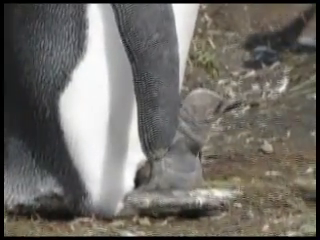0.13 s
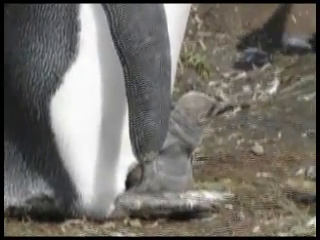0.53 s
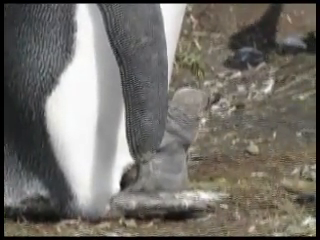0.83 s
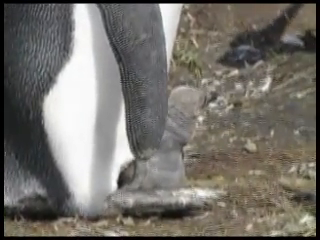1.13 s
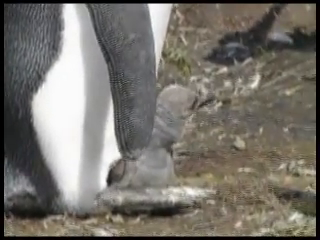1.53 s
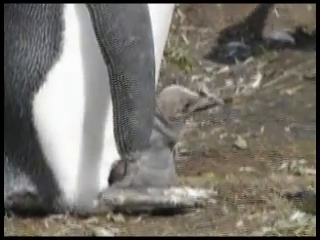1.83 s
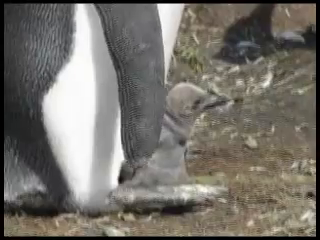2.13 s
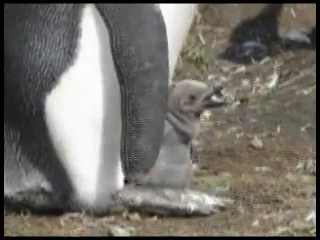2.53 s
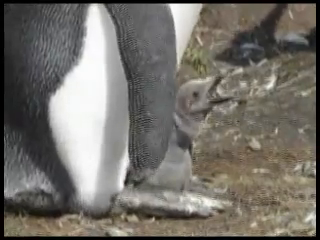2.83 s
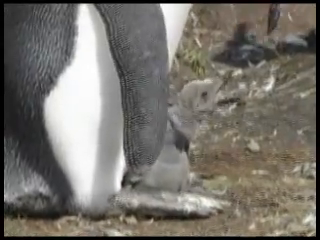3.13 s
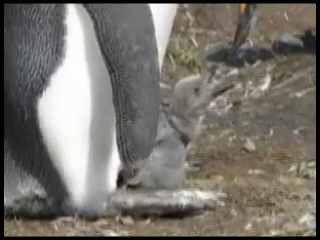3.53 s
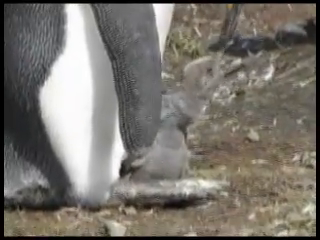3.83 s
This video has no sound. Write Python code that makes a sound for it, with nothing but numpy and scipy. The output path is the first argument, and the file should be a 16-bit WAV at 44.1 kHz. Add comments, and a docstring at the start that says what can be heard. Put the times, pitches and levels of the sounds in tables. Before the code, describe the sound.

A penguin's loud two-toned braying breaks into shorter honks and stops; a chick chirps four times

```python
"""An adult penguin close by brays in honking bursts; the two halves of its voice box buzz at slightly different
pitches and beat. Short runs of slow clicks and a hiss of air fall between honks. Its chick answers with four
thin, partly raspy whistles: gliding sines with a fluttering, hissing rasp. A colony murmurs far off (filtered
noise) with a few soft coos, small ticks sound, and light wind buffets the microphone as low, lumpy noise."""
import sys
import numpy as np
from scipy import signal
from scipy.fft import rfft, irfft
from scipy.io import wavfile
from scipy.ndimage import uniform_filter1d

SR = 44100
rng = np.random.default_rng(int(sys.argv[2]) if len(sys.argv) > 2 else 0)


def output_pcm(signal):
    """Save a mono or channel-first signal as 16-bit PCM at the path in sys.argv[1].

    Samples are clipped to [-1, 1] before scaling.
    """
    pcm = np.clip(np.atleast_2d(signal).T, -1, 1) * 32767
    wavfile.write(sys.argv[1], SR, np.round(pcm).astype(np.int16))


N = 176400
T = np.arange(N) / SR  # time in s

# how throat and beak pass each pitch, for honks and clicks alike: f/Hz, relative level/dB
THROAT = [(180, -70.5), (300, -28), (416, -25), (545, -14.5), (747, -6), (880, -11.5), (1030, -3.5),
          (1150, -12.5), (1280, -6), (1460, -18.5), (1700, -7.5), (2050, -6.5), (2330, -21), (2680, -6.5),
          (3270, -21), (3670, -16), (4920, -21.5), (6400, -28.5), (8000, -39.5), (10000, -52.5),
          (11500, -75)]


def undb(db):
    """Turn decibels into a gain."""
    return 10 ** (np.asarray(db) / 20)


def unit(x):
    """Scale to an rms level of 1."""
    return x / np.sqrt(np.mean(x ** 2))


def colour(x, points, size=4096):
    """Filter through (f/Hz, level/dB) points, with no sound ahead of its cause (minimum phase)."""
    hz, db = np.array(points, float).T
    bin_hz = np.arange(size // 2 + 1) * SR / size
    log_gain = np.interp(np.log(bin_hz + 1), np.log(hz), db) * np.log(10) / 20
    # fold the cepstrum forward in time
    cepstrum = irfft(log_gain)
    cepstrum[1:size // 2] *= 2
    cepstrum[size // 2 + 1:] = 0
    response = irfft(np.exp(rfft(cepstrum)))
    return signal.fftconvolve(x, response)[:len(x)]


def noise(points):
    """Coloured noise with an rms level of 1."""
    return unit(colour(rng.standard_normal(N), points))


def walk(rate):
    """Smooth random wandering: levels drawn rate times a second, slewed twice; rms 1."""
    hold = int(SR / rate)
    steps = np.repeat(rng.standard_normal(N // hold + 1), hold)
    slewed = uniform_filter1d(uniform_filter1d(steps, hold), hold)
    return unit(slewed[:N])


def curve(table, silent=None):
    """Draw each column of a table as straight lines in time; silent is the value after the last row."""
    rows = np.array(table, float).T
    return [np.interp(T, rows[0], column, right=silent) for column in rows[1:]]


def buzz(phase, roll, rough):
    """A train of sharp pulses, each overtone weaker by exp(-roll); uneven and breathy when rough."""
    shimmer_db, breath_db = 6, -7  # both at a roughness of 1
    r, c = np.exp(-roll), np.cos(phase)
    # closed form of the sum of all overtones, scaled to an even level
    pulses = (r * c - r ** 2) / (1 - 2 * r * c + r ** 2)
    pulses = pulses * np.sqrt(2 * (1 - r ** 2)) / r
    breath = unit((1 + c) ** 2 * rng.standard_normal(N))  # puffs once a cycle
    return pulses * undb(shimmer_db * rough * walk(200)) + rough * undb(breath_db) * breath


def adult():
    """Two buzzing voices share one throat; they slip quickly past unison and linger apart."""
    # centre pitches of the two voices: t/s, lower voice f/Hz, upper voice f/Hz
    voices = [(0, 362.8, 389), (.07, 330.6, 369.4), (.1, 367.4, 396.6), (.13, 441.7, 451.4),
              (.165, 471.8, 479.5), (.2, 460.4, 463.4), (.25, 382.3, 428.6), (.36, 331, 363.7),
              (.41, 399, 432.5), (.46, 457.2, 454.6), (.5, 435.7, 460.5), (.56, 406, 437.1),
              (.62, 424.5, 448), (.67, 461.4, 488.2), (.7, 493.3, 519.5), (.74, 463.1, 486),
              (.78, 385, 417.5), (.82, 353.9, 382.9), (.86, 405.1, 434.9), (.9, 464.4, 496.9),
              (.925, 505, 532), (.96, 518.9, 518), (.99, 515, 535), (1.02, 485.8, 510.5),
              (1.06, 440, 469.5), (1.1, 390.3, 415), (1.16, 344.4, 373.4), (1.285, 360, 384.1),
              (1.33, 385.4, 414), (1.41, 342.6, 369.4), (1.6, 189.9, 193.9), (1.625, 347, 372.3),
              (1.68, 330.6, 357.4), (1.735, 185, 186), (1.76, 215.7, 217.5), (1.8, 257.4, 261.6),
              (1.82, 359.5, 402.5), (1.84, 370, 412.1), (1.91, 335, 367.3), (2.0, 120.6, 125.7),
              (2.045, 243.8, 300), (2.065, 352.8, 382.1), (2.11, 403.8, 432.5), (2.19, 348, 380.6),
              (2.44, 181.2, 184.4)]
    # loudness of the bray: t/s, level/dB
    bray = [(0.0, -31.5), (0.07, -37), (0.15, -22.5), (0.38, -40), (0.43, -23), (0.58, -28.5), (0.73, -21),
            (0.74, -25), (0.81, -32.5), (0.95, -17.5), (1.03, -20.5), (1.165, -39), (1.18, -57),
            (1.255, -56), (1.3, -29), (1.34, -26.5), (1.41, -44), (1.44, -58), (1.56, -61.5), (1.61, -32.5),
            (1.67, -41), (1.69, -54.5), (1.73, -53), (1.745, -38.5), (1.85, -29.5), (1.94, -64),
            (2.0, -50.5), (2.06, -33.5), (2.12, -25.5), (2.18, -38.5), (2.2, -56), (2.41, -94), (2.42, -55),
            (2.46, -57), (2.52, -77)]
    low, high = curve(voices)
    db = curve(bray, -120)[0]

    # below -22 dB the voice weakens: it gets rougher and its pulses lose treble
    weak_db = np.clip(-22 - db, 0, 40)
    rough = np.minimum(.018 * (3.0 + weak_db), .28)
    pulse_top_hz = 6880  # overtones of a full voice fall by 1 / e over this span
    duller_per_db, duller_ref_hz = 0.5766, 406  # slower buzzing keeps more treble
    top_hz = pulse_top_hz * undb(-duller_per_db * weak_db * low / duller_ref_hz)

    jitter = 0.0414  # share of the pitch, at a roughness of 1
    a, b = (2 * np.pi * np.cumsum(hz * (1 + jitter * rough * walk(250))) / SR for hz in (low, high))
    beat = b - a
    # in radians: the voices push each other out of step, and both hurry and drag once a beat
    pull, sway_size, sway_lag = 0.51, .35, 1.5
    push = pull / 2 * np.sin(beat)
    sway = sway_size * np.sin(beat - sway_lag)
    lower = buzz(a + sway - push, low / top_hz, rough)
    upper = undb(-0.5) * buzz(b + sway + push, high / top_hz, rough)
    voice = colour(lower + upper, THROAT)

    # even out the level, then set it by the table
    power = uniform_filter1d(uniform_filter1d(voice ** 2, size=3000), size=3000)
    steady = voice / np.sqrt(power)
    beat_db, beat_lag = 1, 2.63  # one shared air stream: swell once a beat; lag in radians
    return steady * undb(db + beat_db * np.cos(beat - beat_lag))


def wind():
    """Wind on the microphone: low lumpy rumble, a brighter buffet whose share varies, a few sudden thumps."""
    # strength of the wind: t/s, rumble level/dB before lumps, buffet level/dB relative to the rumble
    strength = [(0.0, -27.5, -14.5), (.16, -45.5, -7.5), (0.36, -62, 4), (0.59, -39.5, -16),
                (0.78, -34, -11.5), (0.9, -51, -19), (1.09, -36.5, -14), (1.29, -59.5, -2), (1.48, -43, -7),
                (1.84, -47.5, -4), (2.32, -40, -17), (2.53, -45, -9), (2.63, -29.5, -10),
                (2.76, -34.5, -10.5), (2.95, -35, -3.5), (3.0, -43.5, -15), (3.61, -52, -19),
                (4.0, -49, -11)]
    # sudden thumps of wind: t/s, starting level/dB before softening
    bumps = [(0.56, -27.5), (1.96, -31), (2.609, -29.5), (2.678, -48), (2.914, -16.5)]
    # tone of the rumble: f/Hz, relative level/dB
    rumble_tone = [(12, -11.5), (25, 5.5), (50, 0), (85, -7.5), (130, -30), (300, -62.5)]
    # tone of the buffet: f/Hz, relative level/dB
    buffet_tone = [(40, -35.5), (90, 9.5), (150, 1), (250, -7.5), (500, -23.5), (1000, -30.5),
                   (4000, -90.5)]
    thump_t60_s = 0.04  # time to fall by 60 dB

    db, bright_db = curve(strength)
    lumps = unit(walk(29.86) + walk(9.9))
    thumps = sum((T > s) * undb(peak_db - 60 * np.abs(T - s) / thump_t60_s) for s, peak_db in bumps)
    thumps = uniform_filter1d(thumps, size=200)  # soften the onsets
    rumble = noise(rumble_tone) * undb(db + 4.6 * lumps)
    buffet = noise(buffet_tone) * (undb(db + bright_db + 4 * lumps) + thumps)
    return rumble + buffet


def colony():
    """Distant birds blur into third-octave bands of noise, swelling together, each flickering a little."""
    # tone of the murmur: f/Hz, relative level/dB
    murmur_tone = [(120, -45), (200, -14), (280, -18), (340, -19.5), (504, -16), (600, -22), (744, -14.5),
                   (1340, -21.5), (1850, -20.5), (2840, -26), (4920, -30.5), (9000, -38.5), (11000, -51.5),
                   (13000, -67.5)]
    # loudness of the murmur before swells: t/s, level/dB
    murmur_level = [(0, -45), (1.5, -63), (2.4, -64.5), (3.3, -61), (3.7, -58.5)]
    flicker_db, swell_db = 1.5, 3.1  # typical sizes; the flicker shrinks above 2500 Hz

    bed, out = noise(murmur_tone), 0
    edges = 150 * 2 ** (np.arange(21) / 3)  # Hz
    for lo, hi in zip(edges, edges[1:]):
        band = signal.sosfilt(signal.butter(2, [lo, hi], "band", fs=SR, output="sos"), bed)
        out = out + band * undb(flicker_db * walk(24.87) * min(1, 2500 / hi))
    return unit(out) * undb(curve(murmur_level)[0] + swell_db * walk(25))


def small_sounds():
    """Coos are sines that rise and fade while their pitch sags; ticks are quickly fading noise."""
    # short soft coos farther off: t/s, length/s, starting f/Hz, peak level/dB
    coo_rows = [(0.158, 0.11, 224, -46.5), (1.167, 0.053, 227, -48.5), (2.279, 0.046, 476, -53.5),
                (3.036, 0.063, 564, -50.5), (3.095, 0.016, 463, -47.5), (3.457, 0.055, 523, -49.5),
                (3.863, 0.013, 520, -47.5)]
    # small dull ticks: t/s, starting level/dB
    tick_rows = [(3.228, -43.5), (3.541, -57.5), (3.625, -51.5)]
    # tone of a tick: f/Hz, relative level/dB
    tick_tone = [(300, -28.5), (900, 6.5), (2500, -2.5), (5000, -3), (13000, -34.5)]
    coo_sag = 0.25  # share of its pitch that a coo loses by its end
    tick_t60_s = 0.03  # time to fall by 60 dB

    coos, ticks = np.zeros(N), np.zeros(N)
    for s, length, hz, db in coo_rows:
        u = np.clip((T - s) / length, 0, 1)  # 0 to 1 through the coo
        phase = 2 * np.pi * hz * length * (u - coo_sag * u ** 3 / 3)
        coos += undb(db) * np.sin(np.pi * u) * np.sin(phase)
    for s, db in tick_rows:
        ticks += (T > s) * undb(db - 60 * np.abs(T - s) / tick_t60_s)
    return coos + ticks * noise(tick_tone)


def creaks():
    """Slow voice-box clicks, sharp pulses with a noisy ring through the throat; plus air hissing in the beak."""
    # runs of clicks: t/s, clicks, clicks per s, first and last peak level/dB before the ring
    runs = [(1.178, 4, 100, -37, -35), (1.231, 2, 92.5, -43, -40), (1.2527, 4, 97, -31, -27),
            (1.442, 1, 100, -36, -36), (1.5625, 5, 107, -38.5, -28.5), (1.707, 2, 78, -48, -39),
            (2.001, 3, 61, -42.5, -41.5), (2.422, 2, 105, -43.5, -46)]
    # air hissing between two honks: t/s, level/dB
    hiss_level = [(1.12, -75), (1.2, -59.5), (1.33, -50), (1.45, -70.5), (1.55, -95.5)]
    # tone of the hiss: f/Hz, relative level/dB
    hiss_tone = [(2500, -21), (6000, 3.5), (9000, -6.5), (12500, -29)]
    ring_t60_s, ring_db = 0.026, -16  # time to fall by 60 dB; level against the pulse before filtering
    click_top_hz = 2471  # a gentle treble roll-off starts here

    pulses = np.zeros(N)
    for s, count, rate, first_db, last_db in runs:
        k = np.arange(round(count))
        pulses[((s + k / rate) * SR).astype(int)] = undb(np.linspace(first_db, last_db, len(k)))
    fading = signal.lfilter([1], [1, -undb(-60 / ring_t60_s / SR)], pulses)
    ring = fading * rng.standard_normal(N)

    def soften(x):
        """Dull the clicks, then pass them through the throat."""
        dulled = signal.lfilter([1], [1, -np.exp(-2 * np.pi * click_top_hz / SR)], x)
        return colour(dulled, THROAT)

    one_click_peak = np.abs(soften(1. * (T == 0))).max()
    clicks = soften(undb(ring_db) * ring - pulses) / one_click_peak
    return clicks + noise(hiss_tone) * undb(curve(hiss_level)[0])


def chick():
    """A gliding whistle with weak overtones; the rasp is a fast, uneven flutter on it plus hiss."""
    # first three whistles, one table each: t/s, f/Hz before smoothing, level/dB, hiss level/dB of the rasp
    chirps = [
        [(2.665, 4300, -74.5, -73), (2.683, 3550, -33.5, -45), (2.697, 3420, -29.5, -48),
         (2.707, 3260, -33, -59), (2.733, 3224, -33, -54), (2.758, 3400, -31.5, -49.5),
         (2.799, 3625, -31, -47.5), (2.815, 4360, -45, -46.5), (2.835, 3750, -55, -72)],
        [(3.03, 3440, -84, -60), (3.038, 3440, -34.5, -50.5), (3.056, 2730, -42.5, -63),
         (3.064, 3470, -32, -53), (3.07, 4070, -43, -67), (3.08, 3950, -71, -77)],
        [(3.16, 3155, -104, -88), (3.168, 3520, -30, -51), (3.18, 3327, -23, -50.5), (3.208, 3293, -20.5, -70),
         (3.224, 3354, -23.5, -105), (3.229, 3500, -61, -82)],
    ]
    # upward end of the third whistle, same columns: t/s, f/Hz, level/dB, hiss level/dB
    flick = [(3.222, 3330, -57, -82), (3.224, 3710, -36, -74), (3.231, 4090, -44.5, -74.5),
             (3.242, 4450, -71, -95)]
    # fourth whistle, same columns: t/s, f/Hz, level/dB, hiss level/dB
    last_chirp = [(3.712, 3420, -57, -66), (3.718, 3770, -30.5, -51), (3.731, 3710, -25, -42),
                  (3.749, 3324, -14, -70), (3.769, 3200, -18, -88), (3.789, 3166, -22, -90),
                  (3.81, 3233, -17.5, -103), (3.833, 3424, -18.5, -53), (3.855, 3800, -32.5, -45.5),
                  (3.868, 3170, -34, -48.5), (3.89, 3420, -68, -74.5)]
    # octave overtone of each of these five in turn: level/dB relative to the whistle
    octaves_db = [-19, -21, -37.5, -18.5, -33]
    # tone of the hiss: f/Hz, relative level/dB
    rasp_tone = [(2000, -26), (2700, -8), (3400, -10.5), (4300, -15.5), (5000, -1), (6000, 5), (7400, 2),
                 (8500, -18.5), (9300, -8.5), (10000, -10), (11500, -31.5)]
    # how the beak passes the flutter: f/Hz, level/dB
    beak = [(2200, -40), (2750, -3), (3400, 0.5), (4200, 0.5), (5000, -42)]
    third_db, third_fall_db_per_khz = -14, 34.5  # third harmonic against the octave; falls above 3.35 kHz
    flutter_hz, flutter_spread = 820, .14  # centre rate and its wandering, as a share
    flutter_db, octave_flutter_db = 13.5, -11  # gains against the hiss
    wobble = 1  # typical shake in radians when the rasp is as loud as the whistle

    out, hiss, shake = 0, noise(rasp_tone), walk(970)
    flutter_rate = flutter_hz * (1 + flutter_spread * walk(600))
    flutter = np.cos(2 * np.pi * np.cumsum(flutter_rate) / SR)
    for rows, octave_db in zip(chirps + [flick, last_chirp], octaves_db):
        start, end = rows[0][0], rows[-1][0]
        hz, db, rasp_db = curve(rows)
        hz = uniform_filter1d(hz, size=int((end - start) * SR / 10))  # round the corners of the glide
        raspiness = np.sqrt(np.minimum(undb(rasp_db - db), 1))
        phase = 2 * np.pi * np.cumsum(hz) / SR + wobble * shake * raspiness

        octave = undb(octave_db) * np.sin(2 * phase)
        third_fall_db = third_fall_db_per_khz * np.maximum(hz / 1000 - 3.35, 0)
        third = undb(octave_db + third_db - third_fall_db) * np.sin(3 * phase)
        tone = undb(db) * (np.sin(phase) + octave + third)

        rasp = hiss + undb(flutter_db) * colour(flutter * np.sin(phase), beak)
        rasp = rasp + undb(octave_flutter_db) * flutter * np.sin(2 * phase)
        on = (T > start) & (T < end)
        out = out + on * (np.sqrt(2) * tone + undb(rasp_db) * rasp)
    return out


def scene():
    """Open ground: all sources add up with no echo."""
    return (adult() + creaks() + chick() + small_sounds() + colony() + wind())[None]


def record(dry):
    """The recorder cuts the top: a steep low-pass filter at 13090 Hz."""
    return signal.sosfilt(signal.ellip(8, .2, 70, 13090, fs=SR, output="sos"), dry)


dry = scene()
out = record(dry)
output_pcm(out)
```